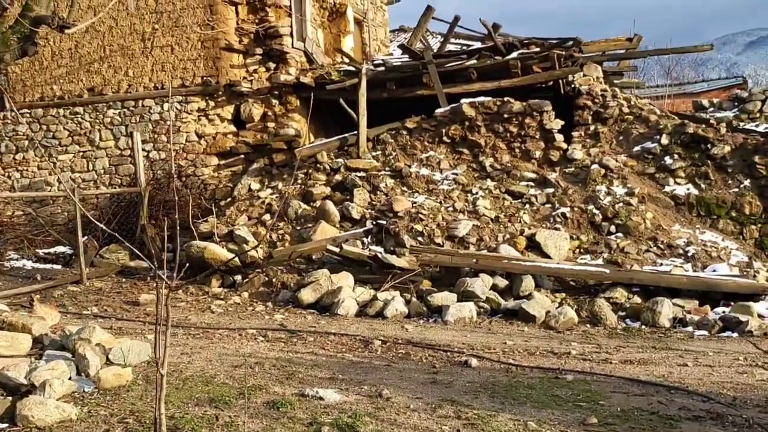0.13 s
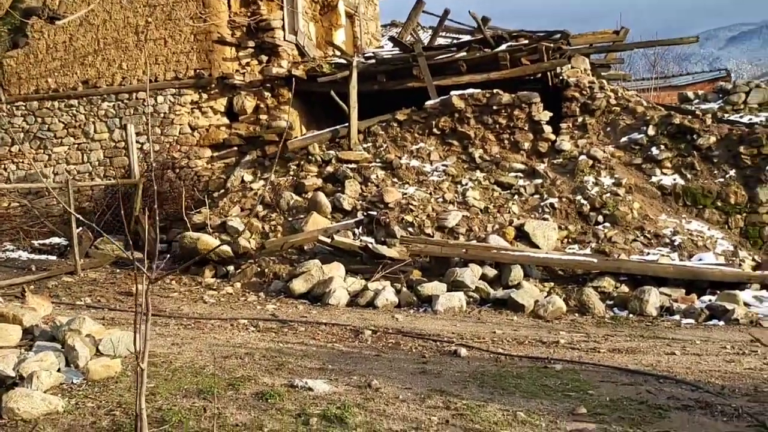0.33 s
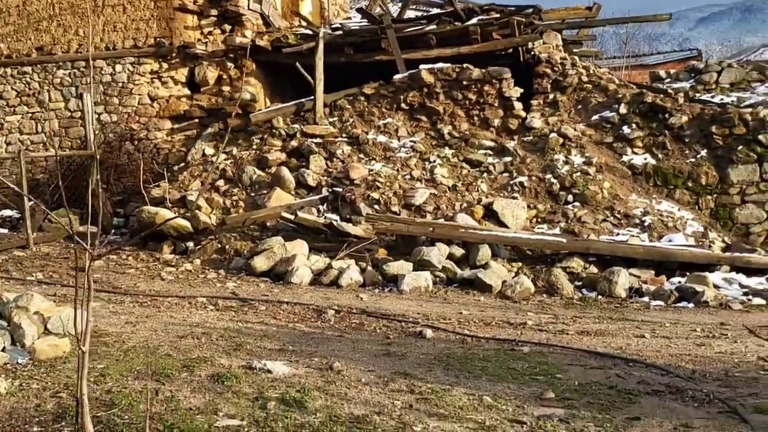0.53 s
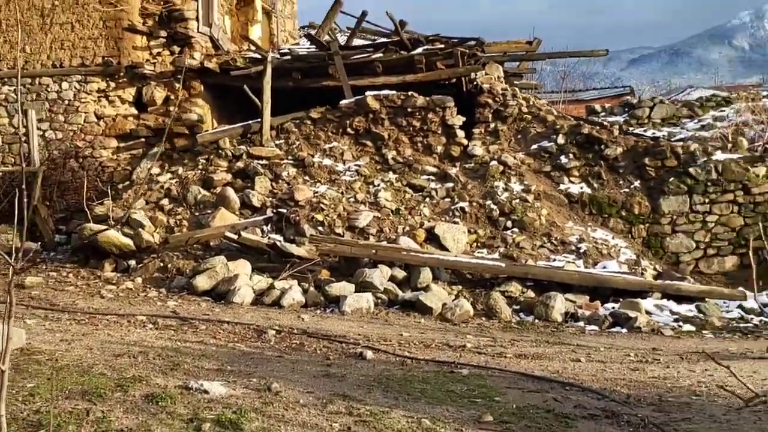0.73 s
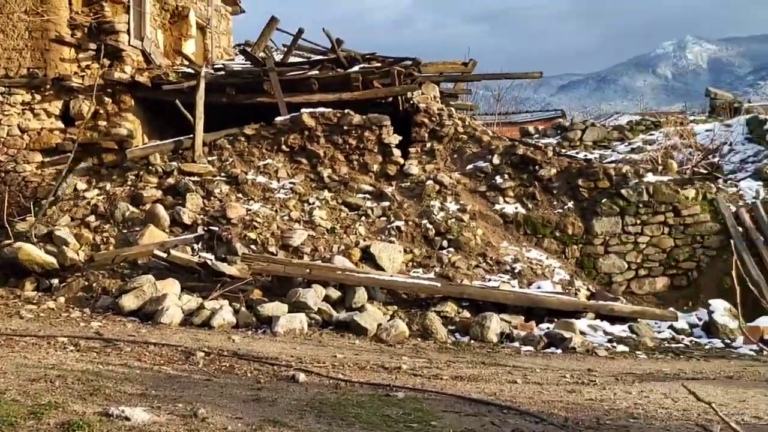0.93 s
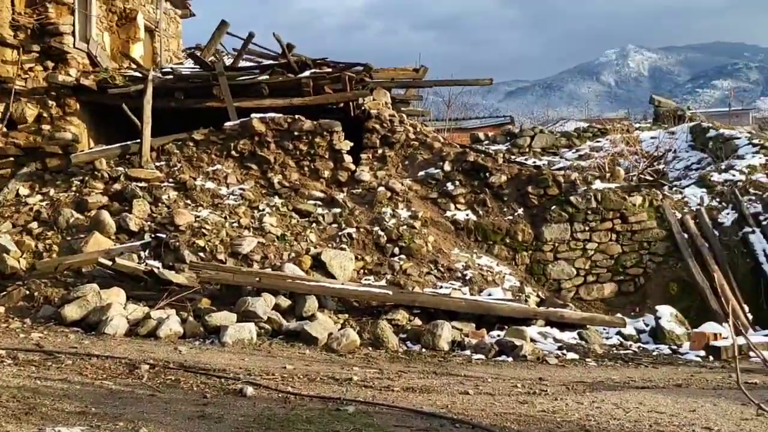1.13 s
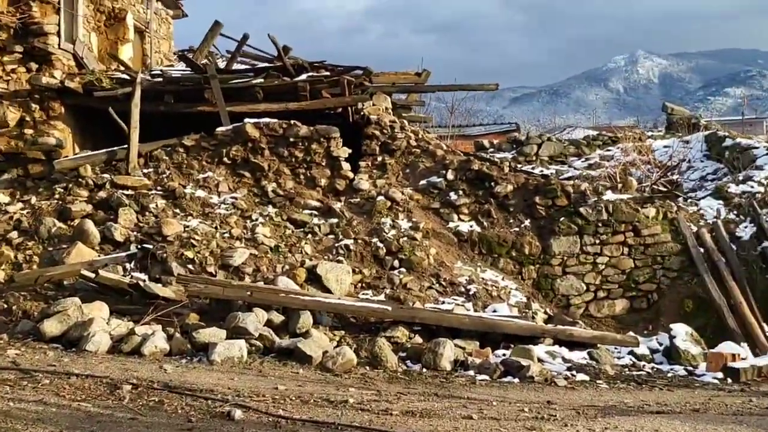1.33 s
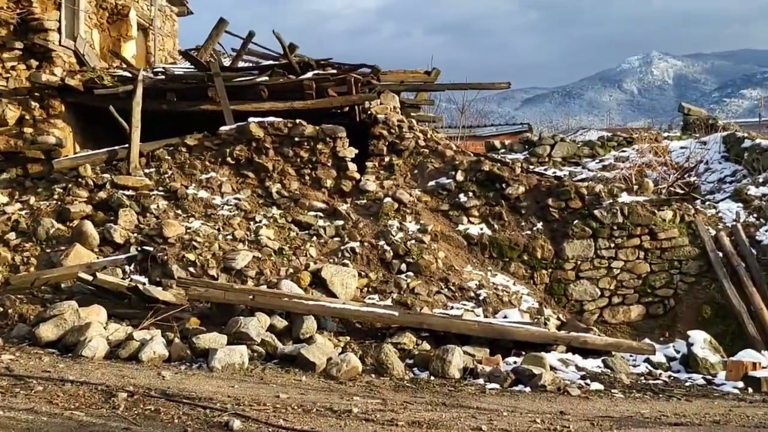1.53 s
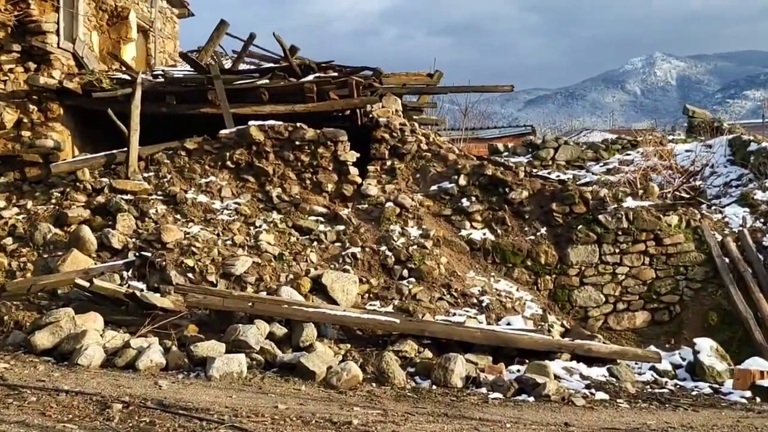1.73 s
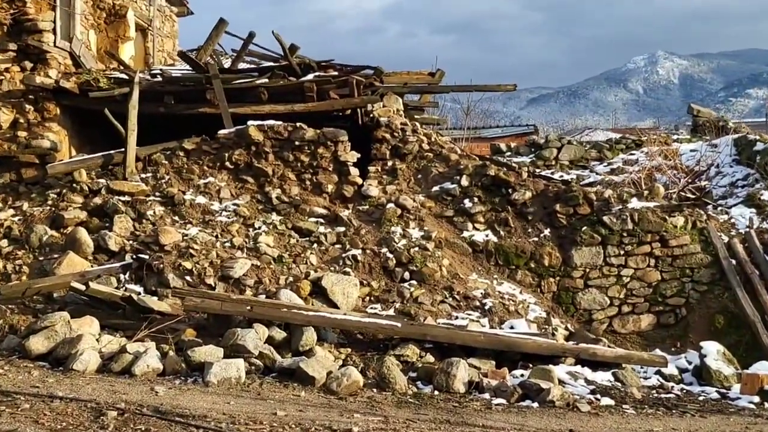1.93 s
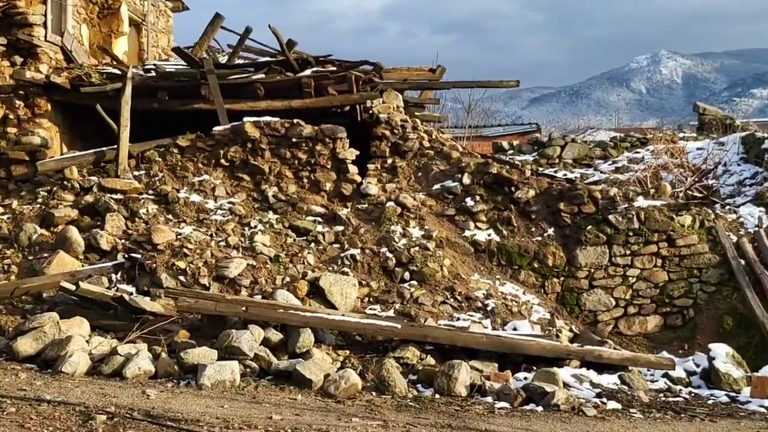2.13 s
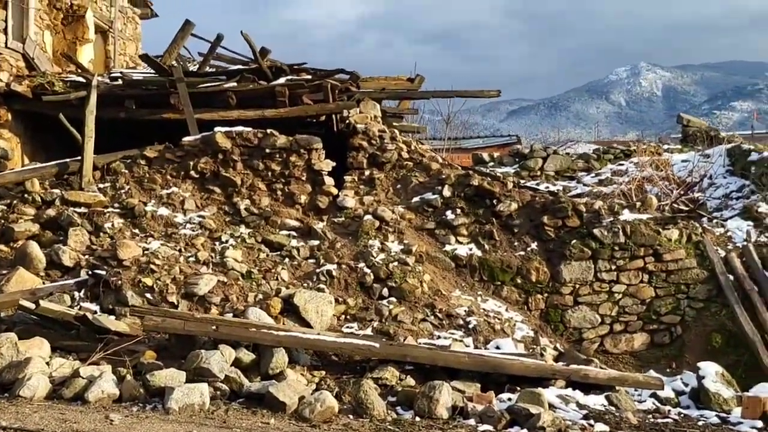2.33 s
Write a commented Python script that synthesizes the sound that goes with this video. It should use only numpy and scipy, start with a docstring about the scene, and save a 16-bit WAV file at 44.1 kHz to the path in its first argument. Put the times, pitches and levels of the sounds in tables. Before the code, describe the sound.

One loud rooster crow, hoarse start, cracking middle, long bright held note, short closing croak

```python
"""A rooster crows once, close by, in a village yard between stone walls.
A hoarse first note, a short clear one, a third that cracks and flutters, then a long held note that
brightens, sags and ends in a croak. Clear notes are stacks of sine waves; rough ones are uneven pulses
and puffs of noise ringing in a throat filter. Delayed copies make the echoes of walls and ground.
Shaped noise makes the wind rumbling on the microphones, a faint far-off sound, village air and bumps."""
import sys
import numpy as np
from scipy import signal
from scipy.fft import rfft, irfft
from scipy.io import wavfile
from scipy.ndimage import uniform_filter1d, map_coordinates

SR = 44100
rng = np.random.default_rng(int(sys.argv[2]) if len(sys.argv) > 2 else 0)


def pcm_store(signal):
    """Save signal as 16-bit PCM."""
    levels = np.round(np.clip(np.atleast_2d(signal), -1, 1) * 32767)
    wavfile.write(sys.argv[1], SR, levels.astype(np.int16).T)


N = 110250
T = np.arange(N) / SR  # time of every sample, s
GRAIN_HZ = 80  # how fast the level grain of the voice changes

# Level of the clear voice
# [t/s, fundamental level/dB, second harmonic level/dB, third harmonic level/dB, treble level/dB]
VOICE = [(0.431, -68, -63, -85, -82), (0.46, -32, -30.5, -37.5, -40), (0.501, -26.5, -22, -37, -36.5),
         (0.528, -29, -29, -38, -43), (0.568, -30, -25.5, -27, -41.5), (.597, -39, -81, -39.5, -52.5),
         (0.649, -45, -56, -52, -94), (0.679, -26, -26, -44, -44), (.80, -31, -23, -43, -42.5),
         (.92, -28, -22, -42.5, -40.5), (1.061, -39.5, -26, -38.5, -41.5), (1.185, -46, -20, -38, -43.5),
         (1.254, -34, -24, -41, -45), (1.352, -35.5, -19.5, -35.5, -33.5), (1.53, -43, -21, -47, -35),
         (1.58, -66.5, -16.5, -42, -33.5), (1.66, -42, -20, -42, -33.5), (1.80, -39, -21, -40, -33.5),
         (1.96, -42, -21.5, -41, -36.5), (2.12, -41.5, -23, -48.5, -30.5), (2.17, -35, -22, -45.5, -35),
         (2.229, -38, -29, -50, -32), (2.254, -36, -56, -78, -46), (2.29, -73, -81, -61, -70)]
# Treble colour with throat and beak in the bright posture [f/Hz, level/dB]
BRIGHT = [(2950, -1), (4480, 1), (5200, 6), (6000, -5), (7450, -5), (8200, -40), (9000, -5), (13400, -4.5),
          (15800, -20)]
# Treble colour in the opening posture [f/Hz, level/dB]
OPENING = [(2950, -4.5), (3700, -6.5), (4500, 0), (5200, -14.5), (6000, -5), (6700, -7.5), (7450, 3.5),
           (8700, -3.5), (13400, 1), (15800, -20)]
# Treble colour in the held posture [f/Hz, level/dB]
HELD = [(2870, -14.5), (3590, 2), (4300, -12.5), (5030, 5), (5740, 0), (6460, -13.5), (7180, -18),
        (7900, -5), (8620, -17), (9340, -4.5), (10400, -26.5), (11480, -8), (12300, -15.5), (13700, -17.5),
        (15800, -27)]
# Treble colour in the strained posture [f/Hz, level/dB]
STRAINED = [(2900, -21.5), (3450, 1), (4350, -11), (5000, 0.5), (5800, -14.5), (7250, -4.5), (8700, -16.5),
            (9430, 2), (10900, -12.5), (13000, -6.5), (15250, -2.5), (15950, -23)]
# Treble colour in the closing posture [f/Hz, level/dB]
CLOSING = [(2700, -15), (3400, 7.5), (4100, -19), (4850, 4.5), (5600, -10), (9000, -12.5), (15800, -26)]
# Order of the postures, each gliding into the next [t/s, posture]
POSTURES = [(.56, BRIGHT), (.66, OPENING), (1.1, OPENING), (1.4, HELD), (1.8, HELD), (2.05, STRAINED),
            (2.13, STRAINED), (2.18, CLOSING)]


def from_db(db):
    """Turn decibels into a gain."""
    return 10 ** (np.asarray(db) / 20)


def rms_one(x):
    """Scale a sound to an average strength (rms) of 1."""
    return x / np.sqrt(np.mean(x ** 2) + 1e-20)


def in_time(rows):
    """Read each column of a table that starts with time, at every sample."""
    s, *columns = np.transpose(rows)
    return [np.interp(T, s, column) for column in columns]


def at_hz(spectrum, hz):
    """Read a spectrum in dB at any frequency, along a logarithmic frequency axis."""
    f, db = np.transpose(spectrum)
    return np.interp(np.log(hz + 1), np.log(f), db)


def colour(x, spectrum):
    """Filter a sound so that it rings after each pulse, never before it (minimum phase); rms 1."""
    log_gain = np.log(from_db(at_hz(spectrum, np.fft.rfftfreq(N, 1 / SR))))
    cepstrum = irfft(log_gain, N)
    one_sided = 2 * cepstrum * (np.arange(N) < N // 2)
    return rms_one(irfft(rfft(x) * np.exp(rfft(one_sided)), N))


def drift(hz):
    """Smooth random wandering with spread 1, made of noise faded out above hz."""
    fade = 1 + (np.fft.rfftfreq(N, 1 / SR) / hz) ** 4
    return rms_one(irfft(rfft(rng.standard_normal(N)) / fade, N))


def pan(db):
    """Left and right gains for a level difference, left minus right."""
    return from_db(np.array([[1], [-1]]) * db / 2)


def burst(s, length, db):
    """A rounded swell peaking at s; one length away from the peak it is down to 14 percent."""
    return from_db(db) * np.exp(-2 * ((T - s) / length) ** 2)


def clear_voice():
    """The syrinx vibrates regularly: harmonics pass the throat, with flutter, period doubling and hiss."""
    # Pitch of the voice, before flutter and wander [t/s, f/Hz]
    pitch_curve = [(.44, 736), (.49, 753), (.525, 735), (.562, 722), (.592, 640.9), (.64, 714.4),
                   (.70, 739), (.81, 758.4), (.92, 748), (1.02, 729), (1.11, 715), (1.175, 729.9),
                   (1.24, 718.2), (1.62, 716.6), (1.76, 722.8), (2.135, 727.5), (2.2, 690.4), (2.26, 641.3)]
    # Unsteadiness of the syrinx [t/s, share of pitch]
    jitter_curve = [(.44, .012), (.48, .0035), (.545, .0045), (.57, .016), (.62, .03), (.685, .0045),
                    (.805, .0045), (.828, .022), (.865, .018), (.89, .0055), (1.03, .0045), (1.14, .0012),
                    (2.12, .0012), (2.2, .003), (2.24, .006)]
    # Flutter [t/s, depth 0-1]
    flutter_curve = [(.79, 0.15), (.825, 1), (.98, 0.9), (1.02, 0.45), (1.14, 0)]
    # Alternate cycles differ, which gives lines between the harmonics; both levels relative to the
    # treble, before their colour is added [t/s, low lines level/dB, high lines level/dB]
    doubling_curve = [(1.30, -48, -45), (1.42, -21, -24), (1.73, -21, -23), (1.82, -38, -16),
                      (1.92, -44, -28), (2.15, -44, -28)]
    # Colour of the lines between the harmonics [f/Hz, level/dB]
    doubling_colour = [(360, -5), (1080, 8.5), (1800, -7), (2500, -5), (3230, 5.5), (4000, -14),
                       (6800, -11), (7550, 0.5), (8500, -6.5), (15000, -5)]
    # Colour of the hiss of air [f/Hz, level/dB]
    hiss_colour = [(500, -20), (4000, -18), (12000, 0)]
    hiss_db = -31  # relative to the treble, before the sqrt(2) at the end adds 3 dB

    (pitch,), (jitter,), (depth,) = map(in_time, (pitch_curve, jitter_curve, flutter_curve))
    low_lines_db, high_lines_db = in_time(doubling_curve)
    *low_db, treble_db = in_time(VOICE)

    flutter_hz, flutter_dip_s, flutter_db, flutter_bend = 26.5, .821, 13, .02  # bend: share of pitch
    beat = 2 * np.pi * flutter_hz * (T - flutter_dip_s)
    wander = .00072 * drift(14.7)  # share of pitch
    pitch = pitch * (1 + flutter_bend * depth * np.sin(beat) + wander)
    phase = 2 * np.pi * np.cumsum(pitch * (1 + jitter * drift(94))) / SR

    # An unsteady syrinx also shakes the strength of the harmonics
    steady_jitter = .002
    grain_db = np.minimum(700 * jitter, 5.5)  # dB per unit of jitter, and limit in dB
    low_grain_db = .29 * grain_db * (jitter > 2 * steady_jitter)
    low = 0
    for k, db in enumerate(low_db, 1):
        low = low + from_db(db + low_grain_db * drift(GRAIN_HZ)) * np.sin(k * phase)

    times, throats = zip(*POSTURES)
    shares = [np.interp(T, times, row) for row in np.eye(len(times))]
    treble_grain_db = np.maximum(grain_db, 1.6)  # the overtones always keep a little grain
    scatter_depth = 17 * np.maximum(jitter - steady_jitter, 0)  # radians per harmonic number
    treble, power = 0, 0
    for k in range(4, 24):
        throat_db = sum(share * at_hz(throat, k * pitch) for share, throat in zip(shares, throats))
        shimmer_db = 3 * drift(14.6)  # each overtone swells on its own
        gain = from_db(throat_db + shimmer_db + treble_grain_db * drift(GRAIN_HZ))
        scatter = scatter_depth * k * drift(170)
        treble = treble + gain * np.sin(k * phase + rng.uniform(0, np.pi) + scatter)
        power = power + gain ** 2

    between = 0
    for k in range(21):
        line_db = low_lines_db if k < 6 else high_lines_db
        line_db = line_db + at_hz(doubling_colour, (k + .5) * pitch.mean())
        between = between + from_db(line_db) * np.sin((k + .5) * phase)

    # The air hisses in step with the vibration
    hiss = from_db(hiss_db) * colour(rng.standard_normal(N) * (1 + np.cos(phase)), hiss_colour)
    dips = from_db(-flutter_db * depth * ((1 + np.cos(beat)) / 2) ** 2)
    upper = from_db(treble_db) * (treble / np.sqrt(power) + between + hiss)
    return np.sqrt(2) * dips * (low + upper)  # sqrt(2) gives a sine of peak 1 an rms of 1


def rasp(pulse_hz, jitter, throat):
    """Irregular pulses, each with a puff of turbulence, ring in the throat with coarse grain; rms near 1."""
    cycles = np.cumsum(pulse_hz * (1 + jitter * drift(300))) / SR
    pulses = rms_one(np.diff(np.floor(cycles), prepend=0))
    puffs = rms_one(rng.standard_normal(N) * np.exp(-4 * (cycles % 1)))
    sound = colour(pulses + puffs, throat)
    running_rms = np.sqrt(uniform_filter1d(sound ** 2, size=500) + 1e-9)
    grain = from_db(1.4 * drift(GRAIN_HZ))
    return grain * sound / running_rms


def rough_voice():
    """The syrinx vibrates chaotically: the first note, the cracks and the closing croak."""
    # Hoarse first note [t/s, level/dB]
    hoarse_curve = [(.105, -58), (.123, -28), (.17, -24.5), (.24, -27), (.28, -29.5), (.335, -43),
                    (.41, -60)]
    # Throat of the first note [f/Hz, level/dB]
    hoarse_throat = [(150, -34), (400, -29.5), (550, -12), (900, -0.5), (1180, -7.5), (1410, 3.5),
                     (1600, -13.5), (1820, -13), (2290, -11), (2880, -36.5), (3270, -5.5), (3900, -31.5),
                     (4450, -21.5), (4850, -30.5), (5120, -23.5), (6300, -37), (10000, -35.5), (16000, -46)]
    # The voice cracks [t/s, length/s, level/dB]
    crack_rows = [(0.453, 0.015, -23.5), (0.58, 0.062, -36), (0.628, 0.056, -41), (0.664, 0.029, -29.5),
                  (0.828, 0.015, -27), (0.861, 0.011, -27.5), (0.877, 0.17, -39)]
    # Throat of the cracks [f/Hz, level/dB]
    crack_throat = [(200, -27.5), (650, -5.5), (1000, 2.5), (1380, 4.5), (1750, -5), (2000, -18),
                    (2600, 2.5), (3050, -24), (3400, 2), (4000, -50), (4500, -23), (16000, -40.5)]
    # Throat of the croak [f/Hz, level/dB]
    croak_throat = [(150, -18.5), (480, 5), (700, 4), (1000, -13.5), (1440, 15.5), (1900, -43), (2420, 5),
                    (2900, -16), (5500, -28.5)]

    # jitter: spread of the pulse rate, as a share of it
    first = from_db(in_time(hoarse_curve)[0]) * rasp(pulse_hz=457.4, jitter=.22, throat=hoarse_throat)
    crack_level = sum(burst(*row) for row in crack_rows)
    cracks = crack_level * rasp(pulse_hz=667.0, jitter=.18, throat=crack_throat)
    croak = burst(s=2.254, length=.023, db=-31) * rasp(pulse_hz=489.2, jitter=.2, throat=croak_throat)
    return first + cracks + croak + flares()


def flares():
    """Narrow rings, sine waves with a wavering phase, swell and die in the rough parts."""
    # Rings in the first note, as the second note breaks, and after the croak
    # [t/s, length/s, level/dB, f/Hz]
    flare_rows = [(0.137, 0.029, -34, 550), (0.213, 0.089, -27, 1400), (0.222, 0.047, -37, 3330),
                  (0.572, 0.016, -30.5, 2810), (2.282, 0.081, -53.5, 3400)]
    rings = 0
    for s, length, db, hz in flare_rows:
        waver = .7 * drift(90)  # radians
        rings = rings + burst(s, length, db) * np.sqrt(2) * np.sin(2 * np.pi * hz * T + waver)
    return rings


def at_microphones(x):
    """Sound reaches the right side later, and with a different balance of frequencies."""
    # The microphones turn: how much later the right one hears [t/s, delay/ms]
    lag_curve = [(.4, 0.442), (1.3, 0.5), (2.1, 0.5122)]
    # Level difference, left minus right [f/Hz, level/dB]
    side_difference = [(700, -1), (1440, -1.5), (2200, 5.5), (3600, 1.5), (6000, 4), (8000, 5.5),
                       (12000, 1), (15500, 9.5)]
    later = np.interp(T - in_time(lag_curve)[0] / 1000, T, x)
    gains = pan(at_hz(side_difference, np.fft.rfftfreq(N, 1 / SR)))
    return irfft(rfft(np.array([x, later])) * gains, N)


def ground(x):
    """Treble glances off the ground; moving microphones change each path, so overtones swell and fade."""
    high_pass = signal.butter(4, 3200, "high", fs=SR, output="sos")
    treble = signal.sosfilt(high_pass, x + 1e-18)
    delays_ms = [2 + .05 * drift(2) for side in range(2)]
    sides = [map_coordinates(treble, [(T - ms / 1000) * SR]) for ms in delays_ms]
    return from_db(-11) * np.array(sides)


def yard(x):
    """Dull echoes return from the walls, with a thin scattered tail from the rubble."""
    # Wall echoes [delay/s, level/dB]
    echo_rows = [(.033, -22), (.078, -23), (.108, -30)]
    tail_db, t60_s = -27, .33  # the tail fades by 60 dB in t60_s
    dull = signal.sosfilt(signal.butter(2, 4500, fs=SR, output="sos"), x + 1e-18)
    tail = rng.standard_normal((2, SR)) * from_db(-60 * T[:SR] / t60_s)
    tail *= from_db(tail_db) / np.sqrt(np.sum(tail ** 2) / 2)
    for s, db in echo_rows:
        arrival_s = s + rng.uniform(0, .001, 2)  # slightly different on each side
        tail[[0, 1], (arrival_s * SR).astype(int)] += from_db(db)
    return signal.fftconvolve(dull[None], tail)[:, :N]


def bumps():
    """Soft bumps and gritty ticks near the microphones: short puffs of noise about an octave wide."""
    # Bumps and ticks [t/s, length/s, level/dB, centre f/Hz]
    bump_rows = [(0.111, 0.014, -43, 258), (0.396, 0.003, -45, 3130), (0.779, 0.011, -43, 374.2),
                 (1.352, 0.0211, -51, 160), (1.528, 0.016, -51, 305)]
    puffs = 0
    for s, length, db, hz in bump_rows:
        edges_hz = [hz / np.sqrt(2), hz * np.sqrt(2)]
        octave = signal.butter(2, edges_hz, "band", fs=SR, output="sos")
        noise = rms_one(signal.sosfilt(octave, rng.standard_normal(N)))
        puffs = puffs + burst(s, length, db) * noise
    return puffs


def far_sound():
    """A faint far-off sound near 1 kHz: filtered noise, partly shared by both sides."""
    # Level of the far-off sound [t/s, level/dB]
    far_curve = [(0, -57.5), (.1, -48.5), (.38, -46), (.6, -65)]
    # Its colour [f/Hz, level/dB]
    far_colour = [(300, -8.5), (850, -10.5), (1120, 2.5), (1450, -12), (12000, -30.5)]
    noise = rng.standard_normal((2, N)) + rng.standard_normal(N)
    return from_db(in_time(far_curve)[0]) * colour(noise, far_colour)


def air():
    """Wind on the microphones and distant village air: filtered noise, partly shared by both sides."""
    # Wind, before it is panned [t/s, level/dB]
    wind_curve = [(0.0, -65), (0.14, -53), (0.73, -54), (0.83, -45.5), (1.27, -63.5), (1.41, -51.5),
                  (1.49, -69), (2.19, -67.5), (2.25, -49), (2.5, -48)]
    # Colour of the wind [f/Hz, level/dB]
    wind_colour = [(15, 7.5), (35, -7.5), (58, 14), (100, -2), (160, -20), (400, -27), (1000, -93.5)]
    # Colour of the village air [f/Hz, level/dB]
    village_colour = [(60, 3.5), (170, -2.5), (350, 2.5), (700, -3.5), (1200, -11.5), (16000, -15.5)]
    wind_noise = rng.standard_normal((2, N)) + rng.standard_normal(N)
    wind = from_db(in_time(wind_curve)[0]) * colour(wind_noise, wind_colour)
    wind = pan(-8) * wind  # stronger on the right
    village_noise = rng.standard_normal((2, N)) + 3.1 * rng.standard_normal(N)
    return wind + from_db(-58.5) * colour(village_noise, village_colour)


def scene():
    """The crow in its yard, with the sounds around it."""
    since_start, until_end = T - VOICE[0][0], VOICE[-1][0] - T
    sounding = np.clip(np.minimum(since_start, until_end) / .005, 0, 1)  # 5 ms fades
    crow = sounding * clear_voice() + rough_voice()
    return at_microphones(crow) + ground(crow) + yard(crow) + bumps() + far_sound() + air()


def record(dry):
    """Cut the top steeply above 15.9 kHz."""
    return signal.sosfilt(signal.ellip(12, .1, 80, 15900, fs=SR, output="sos"), dry)


dry = scene()
out = record(dry)
pcm_store(out)
```